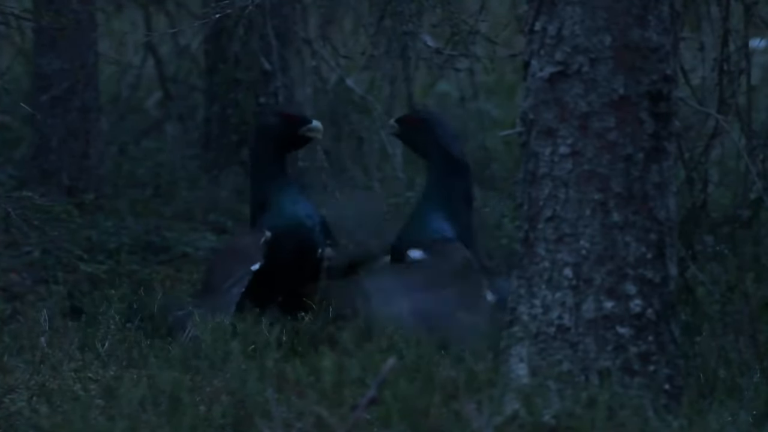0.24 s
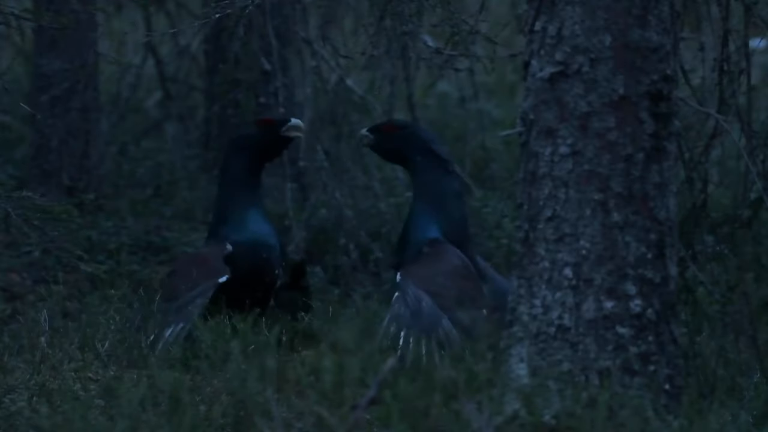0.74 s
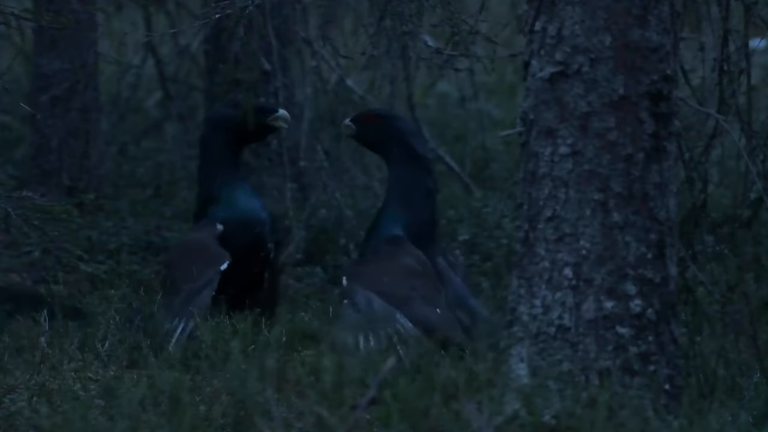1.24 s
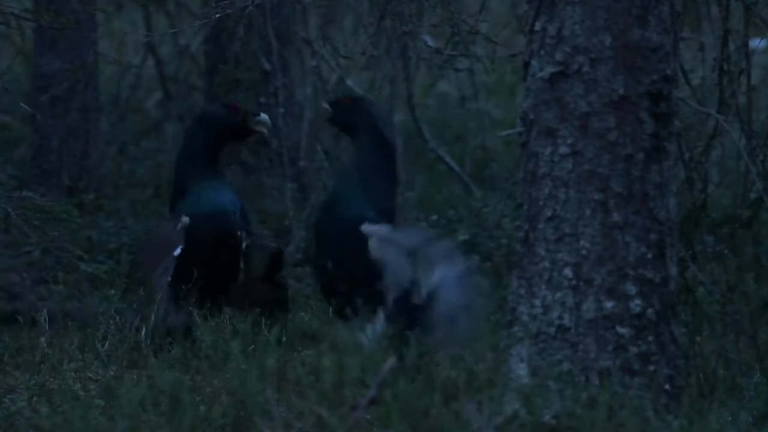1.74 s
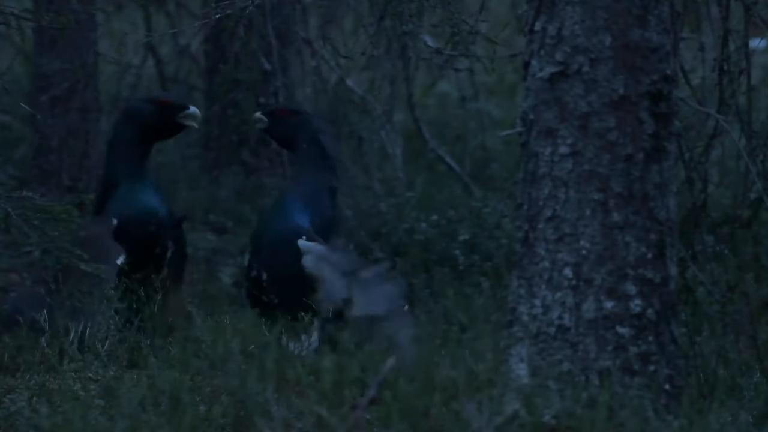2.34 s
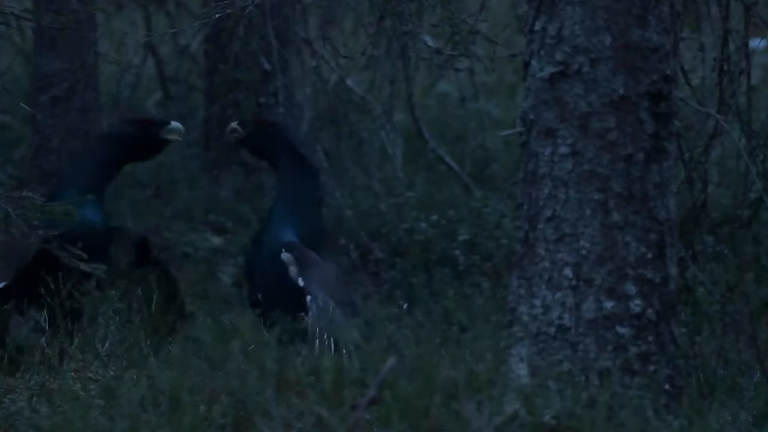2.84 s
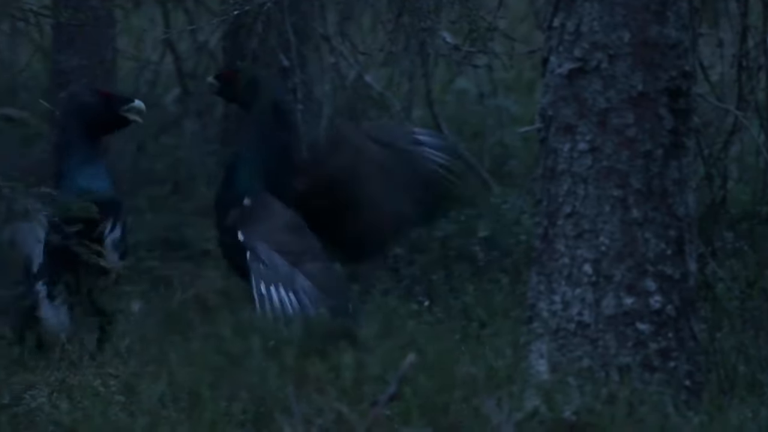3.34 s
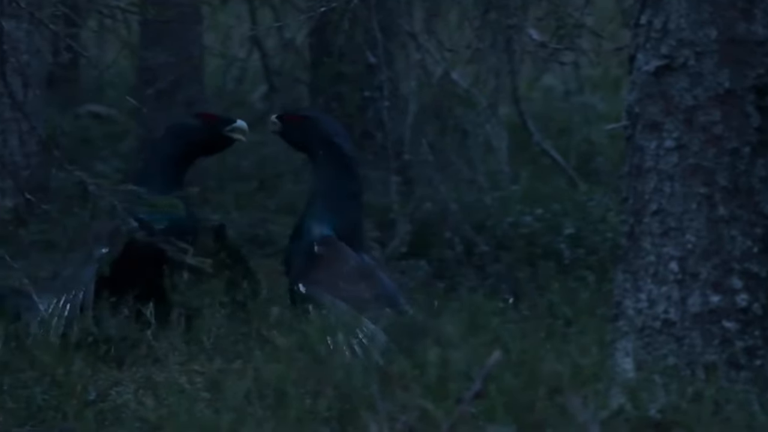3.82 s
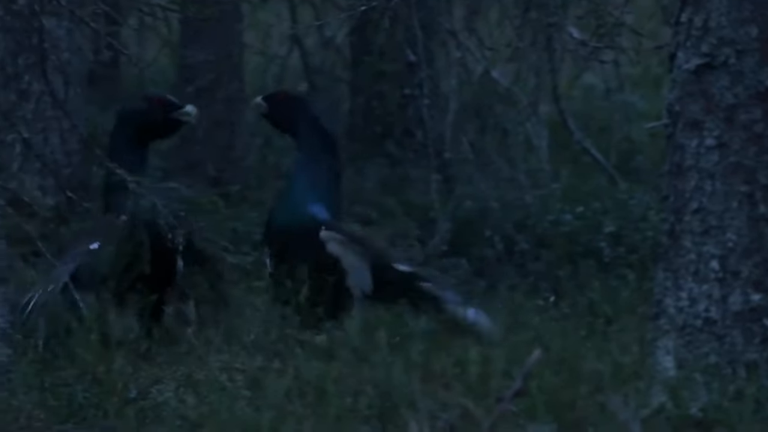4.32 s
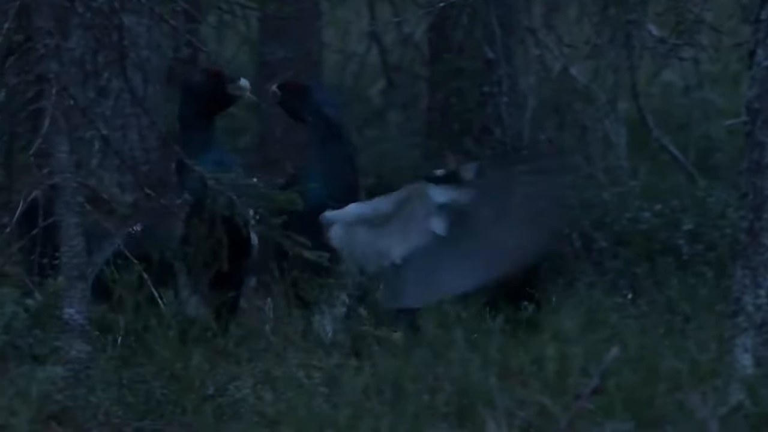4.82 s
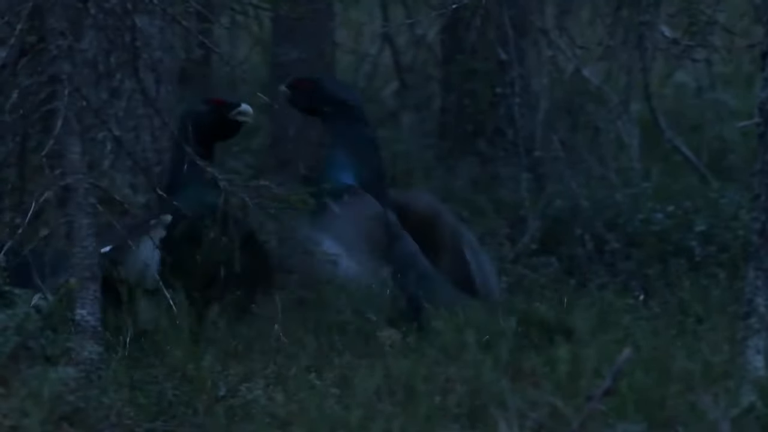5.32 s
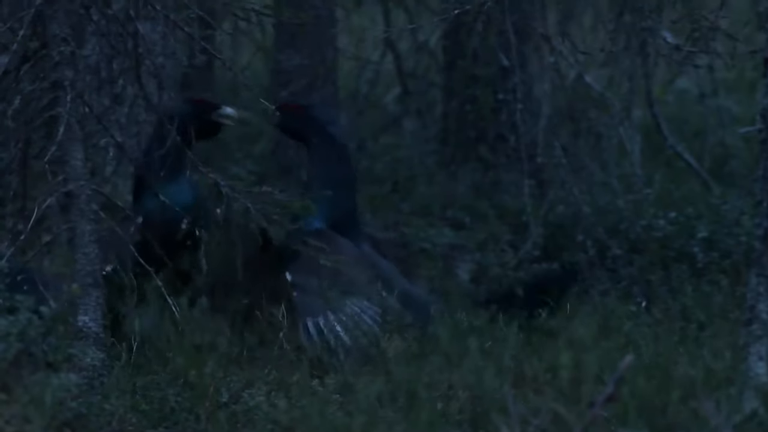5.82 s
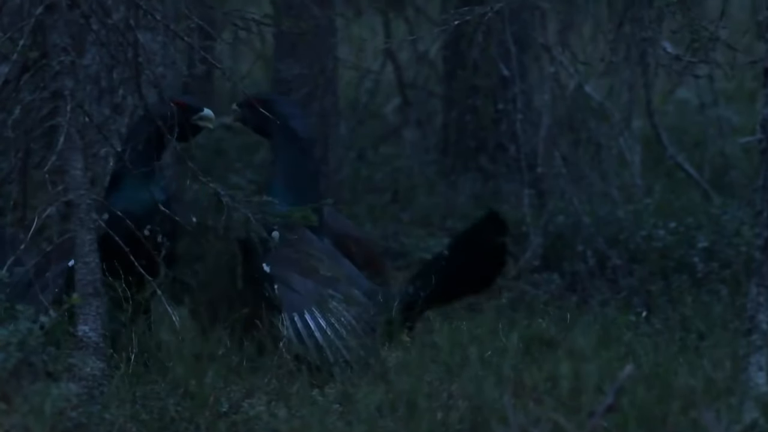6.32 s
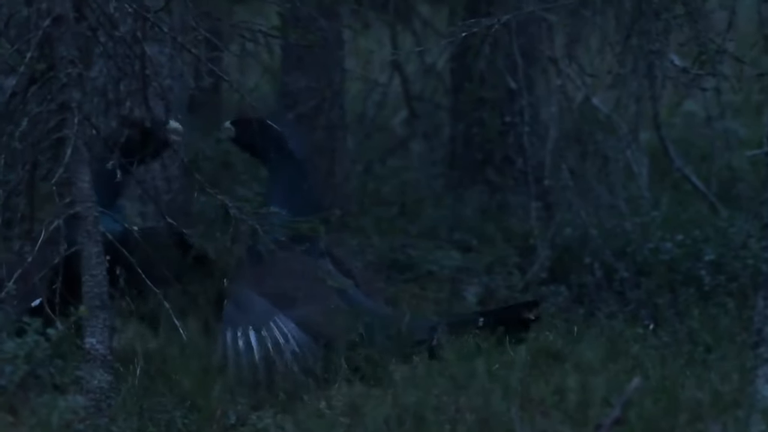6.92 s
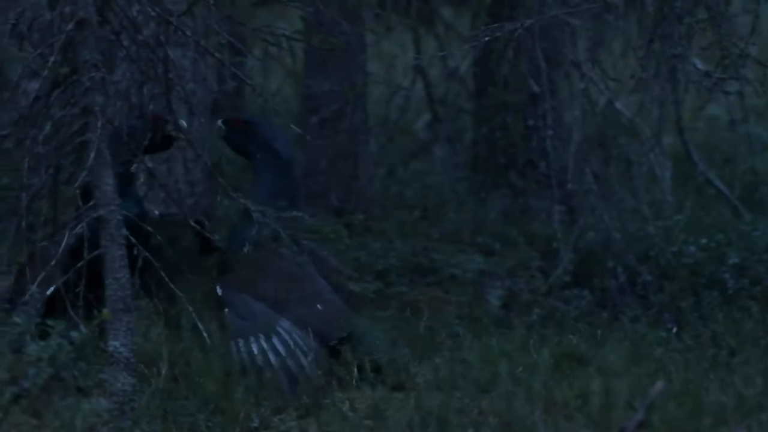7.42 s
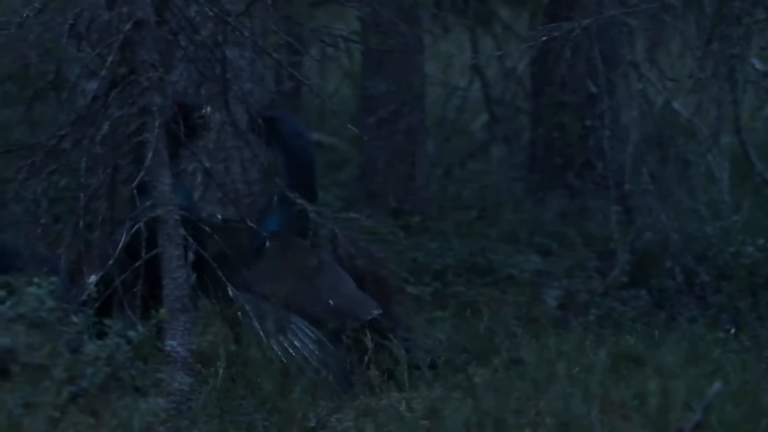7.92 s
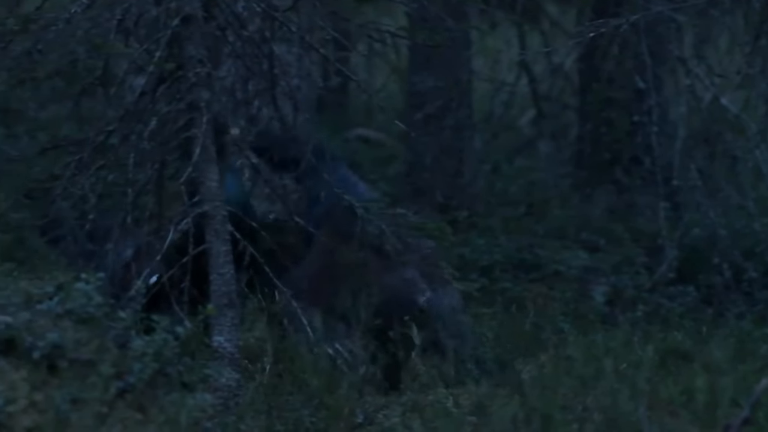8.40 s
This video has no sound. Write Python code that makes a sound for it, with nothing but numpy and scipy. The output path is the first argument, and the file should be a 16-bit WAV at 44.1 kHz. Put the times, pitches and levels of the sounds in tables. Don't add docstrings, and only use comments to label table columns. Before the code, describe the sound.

Quiet forest air, then a sudden crack of wings and a feathery swish. More blows follow singly and in tight clusters, each a dry knock with a soft thump, ticking barbs and dragging feathers. Later two bills snap horn on horn, short and choked, among faint nasal puffs and double windpipe pops. After a last strong wing beat the fight calms to light ticks. Near stereo perspective, birds right of centre.

```python
import sys
import numpy as np
from scipy import signal
from scipy.fft import rfft, irfft
from scipy.io import wavfile

SR = 44100
rng = np.random.default_rng(int(sys.argv[2]) if len(sys.argv) > 2 else 0)


def magnitude_from_level(level_db):
    exponent = np.asarray(level_db, float) / 20
    return 10 ** exponent


def output_pcm(signal):
    pcm = np.clip(np.atleast_2d(signal).T, -1, 1) * 32767
    wavfile.write(sys.argv[1], SR, np.round(pcm).astype(np.int16))


N = 381906
HZ = np.maximum(np.arange(N // 2 + 1) * SR / N, 1)

# frequency in Hz, density in dB per Hz.
HUSH_SPECTRUM = [(25, -11.5), (60, -8), (120, -1.5), (300, -1), (800, -4), (2000, -7), (6500, -11.5),
                 (8500, -20), (12000, -17.5), (16000, -22.5)]
HUSH_DB, HUSH_PAN_DB = -63, -1.2

# frequency in Hz, density in dB per Hz.
FEATHER_SPECTRUM = [(120, -30), (200, -15.5), (683, -4), (763, -1), (916, -7), (1910, -3.5), (6520, -12),
                    (7680, -22), (8740, -20), (13600, -29.5), (16000, -84)]
# full swing from in seconds, held in seconds, level in dB,
# brightness in dB.
SWEEPS = [(.34, 0.075, -59.5, 4.5), (1.91, 0.13, -60, 5), (2.53, 0.084, -55, 5), (3.23, 0.087, -60.5, 3.5),
          (3.4, 0.15, -61, 3), (3.6, 0.033, -69, 12), (4.071, 0.2, -61, 6), (4.53, 0.0099, -73.5, 12),
          (4.92, .03, -82, 10), (4.965, 0.028, -54.5, 6), (5.21, 0.19, -59.5, 5.5), (5.62, 0.014, -69.5, 7),
          (5.77, 0.024, -81, -5), (6.2, 0.081, -80, -10), (6.591, 0.17, -59, 5.5), (8.47, 0.017, -66.5, 6),
          (8.62, .04, -74, 18)]
SWING_UP_DB_S, SWING_DOWN_DB_S = 223, 62.5
STIR_DB, STIR_PAN_DB, SWING_PAN_DB = -73.5, 2, -8.5
# start in seconds, peak in dB, t60 in seconds.
DRAGS = [(0.348, -23.5, 0.12), (1.9455, -20, 0.18), (2.557, -21.5, 0.12), (3.313, -24, 0.16),
         (3.493, -20, 0.13), (4.1122, -21, 0.22), (4.981, -25.5, 0.2), (5.1561, -39, 0.053),
         (5.2844, -25.5, 0.12), (5.31, -33.5, 0.13), (6.6419, -23, 0.16)]
# start in seconds, level in dB, t60 in seconds, centre in Hz.
SWISHES = [(.345, -47, 0.14, 1800), (.42, -49, 0.37, 880), (1.96, -43.5, 0.36, 1700),
           (2.02, -49.5, 0.55, 1450), (2.585, -41.5, 0.59, 1090), (3.33, -53, .4, 1500),
           (3.509, -48.5, 0.41, 1500), (4.13, -45, 0.41, 1400), (4.23, -54, 0.37, 1500),
           (5.0, -48, 0.39, 1510), (5.30, -45.5, 0.49, 1560), (6.66, -48, 0.46, 1510)]

# start in seconds, length in seconds, level in dB, centre in Hz,
# width in Hz.
HISSES = [(0.215, 0.11, -65, 2400, 2020), (1.894, 0.016, -63, 1690, 2300), (3.089, 0.018, -70, 3820, 350),
          (3.176, 0.058, -61.5, 2080, 560), (3.178, 0.037, -66, 2650, 400), (3.176, 0.054, -64, 4750, 900),
          (3.377, 0.041, -59, 5500, 1852), (3.708, 0.022, -68, 3700, 260), (3.753, 0.021, -69, 3850, 260),
          (4.501, 0.079, -61, 4200, 6100), (5.563, 0.054, -62, 2150, 900), (5.606, 0.042, -59, 2110, 850),
          (5.625, 0.015, -59, 2800, 1800), (5.658, 0.059, -68, 2050, 700), (5.563, 0.051, -63, 4970, 4000),
          (5.804, 0.019, -62, 597, 560), (5.906, 0.032, -69, 5800, 350), (5.907, .02, -71.5, 3600, 350),
          (6.283, 0.012, -58.5, 5400, 5000), (6.533, 0.016, -70, 484, 600), (6.557, 0.14, -61.5, 2100, 789),
          (6.621, 0.035, -48, 4100, 6200), (7.223, 0.012, -69, 3800, 400), (8.616, 0.018, -64.5, 2100, 706)]
# start in seconds, length in seconds, level in dB, centre in Hz, width in Hz.
SCUFFS = [(2.509, .014, -51, 1600, 1980), (2.822, 0.0048, -59, 4000, 5040),
          (3.378, .008, -51.5, 5000, 3500), (3.393, 0.0036, -56, 3500, 3000),
          (4.221, 0.0062, -49.5, 2200, 2500), (5.145, .008, -46, 1520, 2010),
          (5.231, 0.0047, -44.5, 4000, 5540), (5.367, .005, -48.5, 4500, 5000),
          (5.391, 0.0046, -51, 3500, 5000), (5.421, 0.0048, -54, 4000, 5000),
          (6.622, 0.0038, -47, 6300, 2000)]
# start in seconds, length in seconds, level in dB.
PUFFS = [
    (1.154, 0.026, -67.5),
    (3.091, 0.014, -62),
    (3.704, 0.023, -62.5),
    (5.779, 0.021, -61.5),
    (5.908, 0.018, -58),
    (6.473, 0.014, -64.5),
    (7.2248, 0.006, -55.5),
    (7.26, 0.022, -66),
    (8.487, 0.0044, -59),
]
PUFF_HZ, PUFF_WIDTH_HZ = 8800, 8000

# start in seconds, woody middle in dB, middle in Hz, sharp edge in dB, edge in Hz.
STRIKES = [(0.3499, -24, 2160, -23.5, 6400), (1.9446, -22, 1720, -41, 3570),
           (1.951, -38, 1660, -21.5, 3620), (1.955, -29, 2410, -39, 3450), (1.9692, -24, 1900, -36, 3830),
           (1.9797, -34, 1870, -34, 5240), (2.5551, -19, 1890, -49, 3640), (2.5605, -21, 2530, -24, 4370),
           (2.5678, -32, 2000, -40, 5430), (3.3102, -26, 1010, -38, 5790), (3.316, -25, 1660, -31.5, 4040),
           (3.495, -23, 2150, -26, 5800), (3.4979, -29, 2860, -22, 3850), (4.1125, -18.5, 1360, -43, 3400),
           (4.1168, -28, 2390, -21, 3380), (4.1215, -25, 1640, -34, 5800), (4.978, -31, 1020, -37, 6300),
           (4.9843, -23.5, 1700, -23.5, 5230), (5.1541, -29.5, 1930, -31.5, 5800),
           (5.234, -34, 2150, -33, 6260), (5.2865, -29, 2300, -31, 3970), (6.639, -39, 1660, -29.5, 3930),
           (6.648, -27.5, 1760, -43, 3660), (6.6575, -33, 2410, -41, 5400)]
# start in seconds, woody middle in dB, middle in Hz,
# sharp edge in dB.
QUILLS = [(0.345, -41, 1320, -42), (1.899, -45, 1900, -50), (1.9619, -30, 1870, -47),
          (2.0524, -34, 2050, -47), (2.509, -45, 2200, -42), (2.514, -47, 1230, -57),
          (2.8262, -55, 2190, -44), (3.3084, -26.5, 960, -43), (3.3225, -35, 1760, -53),
          (3.4905, -39, 3270, -32), (3.5104, -46, 1800, -31), (3.7125, -58, 1900, -47),
          (4.1438, -31, 1710, -29.5), (4.1534, -37, 960, -29.5), (4.2238, -46, 1900, -50),
          (4.936, -44, 1830, -61), (5.1614, -34, 2300, -29.5), (5.2932, -32, 990, -45),
          (5.3091, -36, 1980, -31), (5.3255, -34, 1830, -50), (5.3702, -51, 1940, -43),
          (5.3998, -48, 2450, -33), (5.4225, -48, 1840, -45), (6.6046, -47, 1900, -64),
          (6.7372, -45, 2360, -37), (6.7564, -36, 2450, -38.5), (6.776, -57, 1430, -40.5),
          (8.4639, -47.5, 1850, -60), (8.4891, -52, 2320, -47), (1.9481, -31, 3400, -25.5),
          (1.9661, -32, 1920, -47), (2.5658, -28, 990, -43), (3.4937, -33, 1490, -42),
          (4.118, -22.5, 1940, -36), (4.147, -35, 2000, -45), (4.192, -47, 2400, -53)]
EDGE_HZ = 3500, 7060
REBOUND_S, REBOUND_DB, REBOUND_HZ = (0.00266, 0.015), -15.5, (910, 2300)
BODY_DB = -18.5
FRAY_DB, FRAY_T60_S = -17, 0.012
# start in seconds, level in dB, pitch in Hz.
SLAPS = [(0.3454, -30, 540), (1.9448, -38, 740), (1.9701, -44, 890), (2.5547, -27, 684), (2.5602, -41, 550),
         (2.572, -39, 424), (3.3161, -29, 730), (3.3225, -32, 740), (3.494, -30, 770), (4.112, -30, 930),
         (4.1255, -29, 810), (4.1525, -29, 740), (4.9842, -28, 930), (5.1503, -43, 706),
         (5.286, -37.5, 714), (5.2932, -48, 704), (6.6481, -31, 610), (6.6514, -30.5, 910)]
# start in seconds, level in dB, pitch in Hz.
TWIGS = [(0.3462, -36, 1500), (0.3508, -22.5, 2320), (0.3505, -34, 2300), (0.357, -49, 2050),
         (2.484, -46, 6400), (2.643, -60, 5000), (2.680, -52, 1300), (2.868, -51, 6000), (3.265, -50, 5700),
         (3.3165, -23, 2020), (5.294, -41, 3500), (5.318, -39, 3200), (5.3305, -46, 4200),
         (3.651, -47, 3500), (4.224, -43, 3170), (4.377, -62, 5000), (4.541, -49, 2540),
         (4.9834, -31, 3120), (5.1503, -47, 1180), (3.4953, -27, 2970), (3.498, -23, 4000),
         (5.3095, -31, 5600), (6.615, -49, 1800), (6.6305, -50, 5000), (6.7372, -38, 2800),
         (5.2275, -44, 5530), (5.3926, -53, 2050), (5.7952, -56, 2770), (6.291, -56, 3500),
         (6.887, -53, 5500), (7.903, -58, 5130), (7.9247, -58, 5530), (8.4575, -53, 2900),
         (8.487, -53, 3220), (8.62, -56, 5000)]
# start in seconds, level in dB, pitch in Hz.
BARBS = [(.2664, -46, 2280), (0.3482, -29, 2200), (.3489, -34, 11000), (.351, -30, 8800),
         (3.3095, -30, 1100), (3.3128, -29, 1050), (1.9745, -32, 1700), (1.987, -33, 2200),
         (1.9915, -35, 1600), (1.996, -35, 3900), (4.9953, -31, 1700), (5.0037, -35, 5800),
         (2.646, -43, 900), (1.948, -22, 3470), (1.9493, -23, 1810), (1.964, -26, 1900), (1.967, -28, 1800),
         (1.984, -34, 1850), (2.0567, -37, 1850), (2.1083, -51, 2450), (2.4772, -46, 6000),
         (2.5593, -22.5, 5450), (2.561, -23.5, 6400), (2.6287, -37, 2240), (2.662, -45, 1500),
         (2.7253, -47, 1550), (3.1791, -44, 2110), (3.496, -20.5, 6200), (3.4984, -22, 3700),
         (3.507, -29, 5500), (3.572, -45, 2410), (4.109, -34, 1500), (4.119, -22, 6400),
         (4.5086, -46, 1850), (4.5477, -49, 2370), (4.9272, -46, 1770), (4.9767, -31, 1500),
         (5.0011, -31, 5810), (5.0062, -35, 2110), (5.0423, -33, 2410), (5.081, -45, 3490),
         (5.103, -44, 5940), (5.272, -42, 3360), (5.3234, -35, 3880), (5.3358, -37, 1550),
         (5.339, -41, 5870), (5.3703, -42, 3500), (5.4035, -37, 2110), (5.4456, -46, 1770),
         (6.601, -44, 1900), (6.624, -38, 6100), (6.6447, -28, 1600), (6.645, -26, 2600),
         (6.744, -41, 1850), (6.7792, -46, 2970), (8.4589, -50, 2500), (8.4645, -50, 3300),
         (8.49, -48, 6000), (8.6206, -51, 5080)]

# start in seconds, peak in dB, pitch in Hz, t60 in seconds.
THUMPS = [(0.344, -41, 111, 0.12), (0.748, -61, 115, 0.11), (1.906, -61, 125, 0.27),
          (1.943, -46.5, 115, 0.2), (2.555, -40.5, 110, 0.14), (3.306, -35.5, 172.5, 0.1),
          (3.498, -45, 166, 0.1), (4.107, -46, 108, 0.19), (4.936, -58, 128.7, 0.11),
          (4.972, -39, 165.5, 0.11), (5.15, -38.5, 146, 0.074), (5.227, -59, 130.6, 0.2),
          (5.286, -43.5, 126, 0.14), (5.802, -61, 110, 0.14), (6.638, -43, 128, 0.11),
          (7.221, -63, 159, 0.13)]

# start in seconds, level in dB, pitch in Hz, t60 in seconds.
WHISTLES = [(2.02, -52, 1600, .12), (2.028, -52, 770, .09), (2.622, -49, 2450, .05), (2.63, -50, 760, .12),
            (2.675, -50, 1350, .08), (2.768, -54, 960, .08), (3.698, -57, 3700, .03),
            (3.709, -54, 3720, .05), (3.754, -60, 3800, .05), (4.168, -46, 1570, .06),
            (4.185, -50, 2400, .05), (4.248, -53, 1550, .2), (7.234, -58, 5900, .03)]
# start in seconds, peak in dB, pitch in Hz, second knock in dB, overtone in dB.
POPS = [(3.263, -58, 850, -13, -10), (3.7, -47.5, 670, -1, -5), (4.562, -53, 673, -10, -12),
        (5.779, -45.5, 697, -6, -3), (6.2415, -53, 670, -4, -12), (6.266, -49.5, 745, -4, -2),
        (6.284, -44, 705, -9, 0), (6.4145, -49.5, 680, -5, -11), (6.543, -53, 664, -7, -15),
        (7.226, -53, 680, -3, -8), (8.457, -56.5, 750, 0, -8), (8.486, -51, 746, -10, -8)]
POP_RISE = 0.24

# start in seconds, peak in dB, upper ring in dB, left minus right in dB, damping share.
SNAPS = [
    (5.6443, -22, 1, -7.5, 0.92),
    (5.6604, -29, -12, -15.5, 0.53),
    (5.795, -38, -6, -22, 0.46),
    (5.8585, -54, -11, -12, 0.73),
    (6.1269, -23, -4, -12, 0.91),
]
# frequency in Hz, level in dB, t60 in seconds.
BEAK_MODES = [(1520, -5.5, 0.004), (2050, -7, 0.068), (2450, 7.5, 0.0048), (3050, -4, 0.004),
              (4000, -4, 0.0088), (4800, 17.5, 0.0023), (6150, 4, 0.0049), (7160, -2, 0.0045),
              (8400, 6, 0.0021), (10600, 2.5, .002)]
RING_PAN_DB, RING_SAG = -8.5, 0.044
FAR_PORT_S = .0006

# frequency in Hz, left minus right in dB.
LEAN = [(250, 0), (600, -6), (1300, -11.5), (6500, -12), (8500, -3), (14000, 0.5)]
# centre in Hz, width in Hz, depth in dB.
DEAD_SPOTS = [(7630, 790, -14), (9660, 630, -12), (7680, 160, -12), (9610, 160, -14)]
TOP_HZ = 15750


def colour(x, points):
    hz, db = np.transpose(points)
    return irfft(rfft(x) * magnitude_from_level(np.interp(np.log(HZ), np.log(hz), db)), N)


def unit(x):
    return x / np.sqrt(np.mean(x ** 2))


def band(x, lo_hz, hi_hz):
    return signal.sosfilt(signal.butter(2, [lo_hz, hi_hz], "band", fs=SR, output="sos"), x)


def add(track, s, sound):
    i = int(s * SR)
    n = min(sound.shape[-1], N - i)
    track[..., i:i + n] += sound[..., :n]


def decay(t60, rise_s, length=.5):
    t = np.arange(int(length * SR)) / SR
    return magnitude_from_level(-60 * t / t60) * (1 - np.exp(-t / rise_s))


def ring(hz, t60, rise_s, length=.5, glide=0, glide_s=0.0049):
    shape = decay(t60, rise_s, length)
    t = np.arange(len(shape)) / SR
    warped_s = t + glide * glide_s * (1 - np.exp(-t / glide_s))
    return shape * np.sin(2 * np.pi * hz * warped_s)


def sides(pan_db):
    return magnitude_from_level(np.array([pan_db, -pan_db]) / 2).reshape(2, -1)


def between(ends, share):
    return ends[0] + share * (ends[1] - ends[0])


def grainy(spread_db, grain_s):
    k = int(grain_s * SR)
    grain_db = spread_db * rng.uniform(-np.sqrt(3), np.sqrt(3), N // k + 1)
    size = magnitude_from_level(np.repeat(grain_db, k)[:N])
    shared = rng.standard_normal(N)
    return unit(size * (shared + 1.05 * rng.standard_normal((2, N))))


def hush():
    air = unit(colour(rng.standard_normal((2, N)), HUSH_SPECTRUM))
    return magnitude_from_level(HUSH_DB) * air * sides(HUSH_PAN_DB)


def feathers():
    t = np.arange(N) / SR
    swing, sheen = np.zeros((2, N))
    for s, held_s, db, bright_db in SWEEPS:
        rise_db = -SWING_UP_DB_S * np.maximum(s - t, 0)
        fall_db = -SWING_DOWN_DB_S * np.maximum(t - s - held_s, 0)
        shape = magnitude_from_level(db + rise_db + fall_db)
        swing += shape
        sheen += bright_db * shape
    effort = swing + magnitude_from_level(STIR_DB)
    bright_db = sheen / effort
    pan_db = STIR_PAN_DB + 10.0 + (SWING_PAN_DB - STIR_PAN_DB) * swing / effort
    for s, db, t60 in DRAGS:
        add(effort, s, magnitude_from_level(db - 12.5) * decay(t60, 0.00025))

    swish, flutter = np.zeros((2, N)), grainy(4.2, .008)
    for s, db, t60, hz in SWISHES:
        second = flutter[:, int(s * SR):][:, :SR]
        vanes = unit(band(second, 0.58 * hz, 1.42 * hz))
        add(swish, s, magnitude_from_level(db) * decay(t60, 0.074, 1) * vanes)

    rustle = unit(colour(grainy(2.3, .0015), FEATHER_SPECTRUM))
    top = band(rustle, 5200, 22000)
    return (effort * (rustle + (magnitude_from_level(bright_db) - 1) * top) + swish) * sides(pan_db)


def hisses():
    out = np.zeros(N)
    puffs = [(*puff, PUFF_HZ, PUFF_WIDTH_HZ) for puff in PUFFS]
    for s, length_s, db, hz, width_hz in HISSES + SCUFFS + puffs:
        edges = hz - width_hz / 2, hz + width_hz / 2
        noise = band(band(rng.standard_normal(8192), *edges), *edges)
        air = unit(noise)[-int(length_s * SR):]
        add(out, s, magnitude_from_level(db) * air * signal.windows.tukey(len(air), 0.45))
    return out


def cracks():
    out = np.zeros(N)
    spike = 2.5 * ring(4500, .0007, .00005, .05) + .3 * ring(11500, .001, .00003, .05)
    tick = 0.35 * ring(9540, 0.0033, .0001, .05)

    def body(hz):
        return ring(hz, 0.014, 0.0012, .05)

    def knock(s, middle_db, middle_hz, edge_db, edge_hz, u, fray):
        middle = ring(middle_hz, .006, .0003, .05) + .6 * ring(1200 + 2000 * u[1], .003, .0001, .05)
        edge = .7 * ring(edge_hz, .0022, .0001, .05) + 1.2 * spike
        hit = magnitude_from_level(middle_db + 2.0) * (middle + magnitude_from_level(BODY_DB) * body(520 + 480 * u[0]))
        hit = hit + magnitude_from_level(edge_db + 0.5) * (edge + tick)
        add(out, s, hit)
        add(out, s, np.convolve(hit, fray))

    chance = rng.random((len(STRIKES + QUILLS), 2, 5))
    spray_shape = decay(FRAY_T60_S, 0.0002, 900.5 / SR)
    sprays = magnitude_from_level(FRAY_DB) * rng.standard_normal((len(chance), 900)) * spray_shape
    quills = [(*quill, between(EDGE_HZ, u[0, 2])) for quill, u in zip(QUILLS, chance[len(STRIKES):])]
    for (s, db, hz, edge_db, edge_hz), (u, v), fray in zip(STRIKES + quills, chance, sprays):
        knock(s, db, hz, edge_db, edge_hz, u, fray)
        again_s, again_hz = s + between(REBOUND_S, v[3]), between(REBOUND_HZ, v[4])
        knock(again_s, db + REBOUND_DB, again_hz, edge_db + REBOUND_DB, between(EDGE_HZ, v[2]), v, fray)
    for s, db, hz in SLAPS:
        add(out, s, magnitude_from_level(db + 4.5) * body(hz))
    for s, db, hz in TWIGS:
        add(out, s, magnitude_from_level(db + 4) * (ring(hz, .003, .0001, .05) + spike))
    for s, db, hz in BARBS:
        add(out, s, magnitude_from_level(db + 1.0) * (ring(hz, .0045, 0.00028, .05) + .3 * spike))
    return band(out, 380, 16000)


def trunks(x, t60=0.93, level_db=-24):
    tail = band(rng.standard_normal((2, SR)), 530.0, 2200) * decay(t60, 0.0016, 1)
    tail /= np.sqrt(np.sum(tail ** 2, axis=1, keepdims=True))
    blurred = x * unit(band(rng.standard_normal(N), 30, 1600))
    return magnitude_from_level(level_db) * signal.fftconvolve(blurred[None], tail, axes=1)[:, :N]


def thumps():
    puff, eddies = np.zeros((2, N))
    for s, db, hz, t60 in THUMPS:
        low = ring(hz, 0.56 * t60, 0.01) + .5 * ring(2.41 * hz, 0.23 * t60, 0.0051)
        add(puff, s, magnitude_from_level(db + 11.5) * low)
        add(eddies, s, magnitude_from_level(db - 7.5) * decay(2.23 * t60, 0.0019))
    roll = unit(band(band(rng.standard_normal(N), 62, 206), 68, 540))
    return puff + eddies * roll


def throats(overtone=1.9):
    out = np.zeros(N)
    for s, db, hz, t60 in WHISTLES:
        add(out, s, magnitude_from_level(db + 5.5) * ring(hz, t60, .13 * t60, .2, glide=.015, glide_s=.02))
    for s, db, hz, after_db, over_db in POPS:
        pop = ring(1.173 * hz, 0.022, 0.0013, glide=-POP_RISE)
        pop += 0.29 * ring(0.86 * hz, 0.02, 0.0017)
        pop += magnitude_from_level(over_db) * ring(overtone * hz, 0.013, 0.0026, glide=-0.0096)
        pop += magnitude_from_level(-12.0) * ring(3.1 * hz, 0.0072, 0.00032)
        pop *= magnitude_from_level(db + 5.5)
        add(out, s, pop)
        add(out, s + 0.011, magnitude_from_level(after_db) * pop)
    return out


def beaks(shut_s=0.0052):
    out = np.zeros((2, N))
    grit = rng.standard_normal((len(SNAPS), 2, 4410))
    for (s, db, upper_db, pan_db, share), noise in zip(SNAPS, grit):
        low, high = np.zeros((2, 4410))
        for hz, mode_db, t60 in BEAK_MODES:
            if hz < 3000:
                low += magnitude_from_level(mode_db) * ring(hz, share * t60, 0.00072, .1, RING_SAG, 0.0021)
            else:
                high += magnitude_from_level(mode_db + upper_db) * ring(hz, 1.15 * share * t60, 0.00075, .1)
        choke = 1 / (1 + (np.arange(len(low)) / SR / (share * shut_s)) ** 5.5)
        scrape = magnitude_from_level(-12.5) * band(noise, 2000, 5300) * decay(0.019, 0.00066, .1)
        scrape += magnitude_from_level(-14) * band(noise, 1400, 3100) * decay(0.066, 0.0018, .1)
        snap = (low * sides(RING_PAN_DB) + high) * choke + scrape
        left, right = magnitude_from_level(db - 3) * snap * sides(pan_db + 5.5)
        add(out[0], s + FAR_PORT_S, left)
        add(out[1], s, right)
    return out


def lean(x, lead_s=.00002):
    left = colour(x[0], [(hz, db / 2) for hz, db in LEAN])
    right = colour(x[1], [(hz, -db / 2) for hz, db in LEAN])
    left = irfft(rfft(left) * np.exp(2j * np.pi * HZ * lead_s), N)
    return np.array([left, right])


def scene():
    wings, snaps = cracks(), beaks()
    echo = trunks(wings + magnitude_from_level(-19) * snaps[1])
    birds = feathers() + hisses() + wings + echo + thumps() + throats() + snaps
    return lean(birds) + hush()


def band_limit(x):
    return signal.sosfilt(signal.butter(12, 16460, fs=SR, output="sos"), x)


def record(dry, apart_hz=700):
    mid, side = rfft(dry[0] + dry[1]) / 2, rfft(dry[0] - dry[1]) / 2
    side = side / np.sqrt(1 + (apart_hz / HZ) ** 4)
    notch_db = sum(db * np.exp(-((HZ - hz) / width_hz) ** 2 * 4) for hz, width_hz, db in DEAD_SPOTS)
    response = magnitude_from_level(notch_db) * (HZ < TOP_HZ)
    mix = irfft(np.array([mid + side, mid - side]) * response, N)
    return band_limit(mix)


dry = scene()
out = record(dry)
output_pcm(out)
```